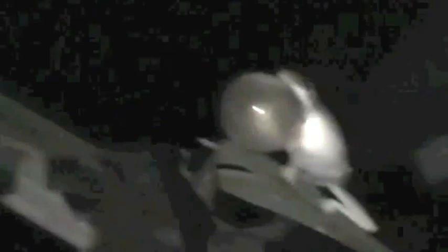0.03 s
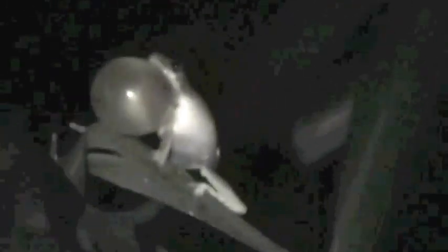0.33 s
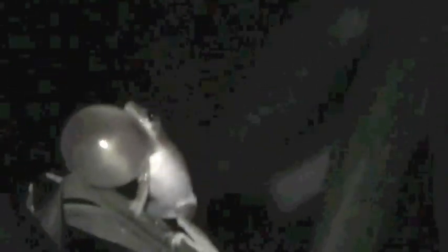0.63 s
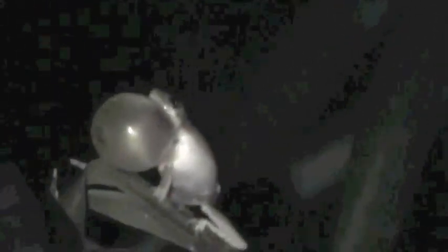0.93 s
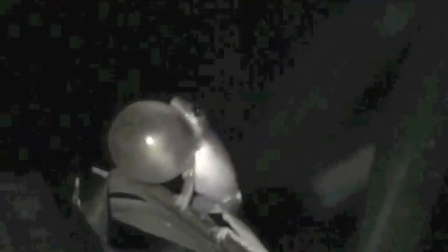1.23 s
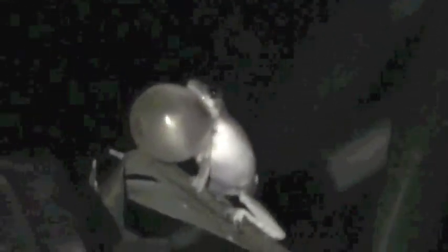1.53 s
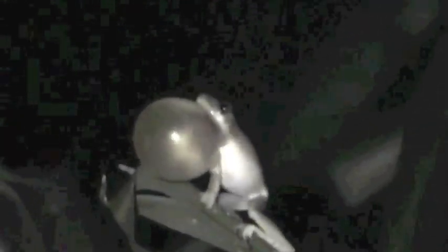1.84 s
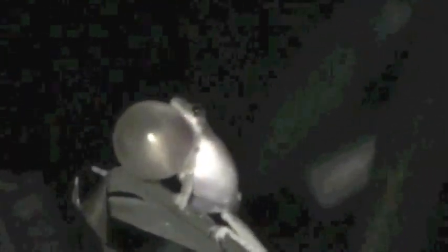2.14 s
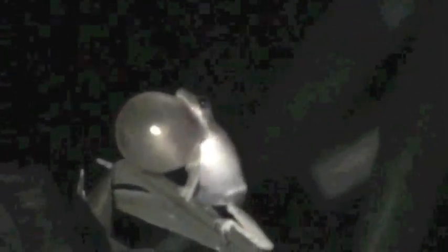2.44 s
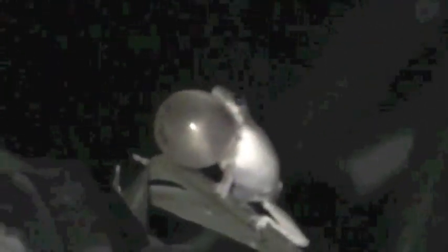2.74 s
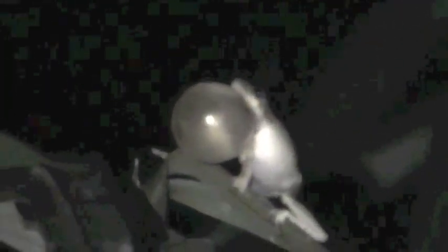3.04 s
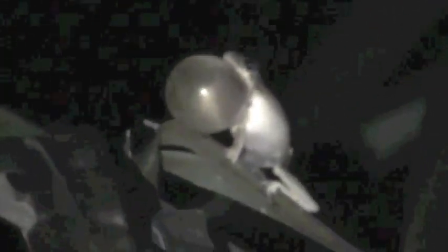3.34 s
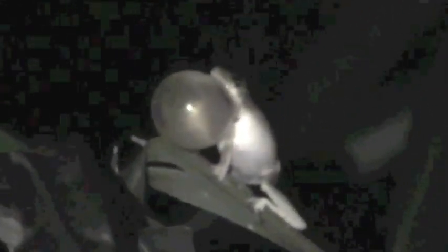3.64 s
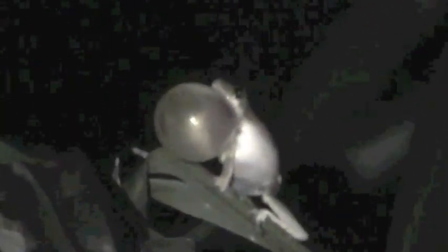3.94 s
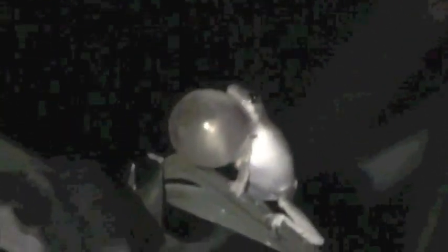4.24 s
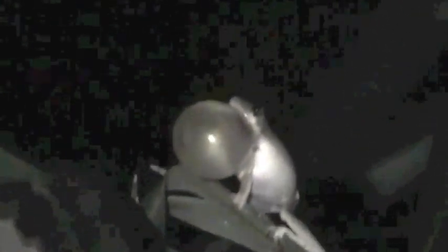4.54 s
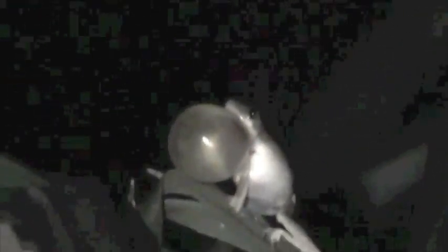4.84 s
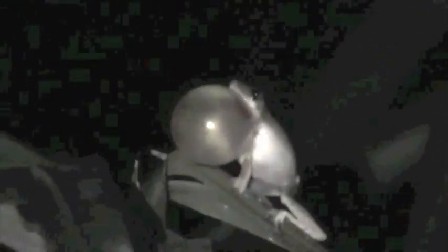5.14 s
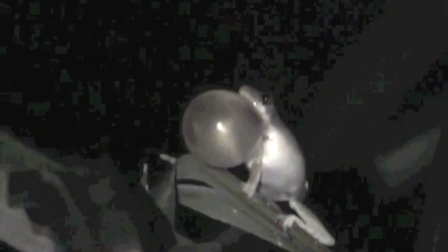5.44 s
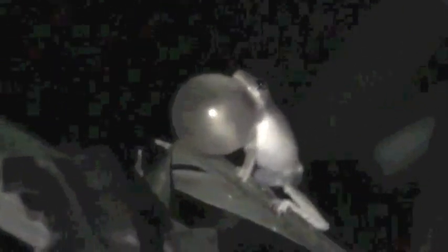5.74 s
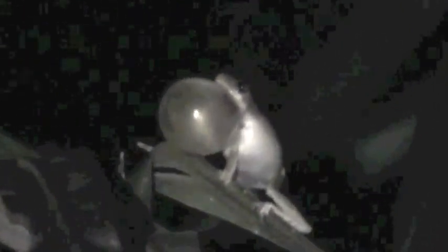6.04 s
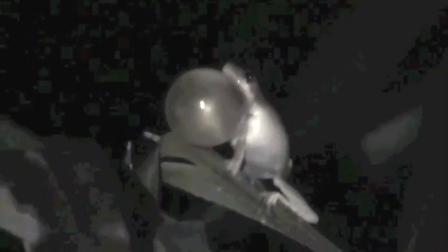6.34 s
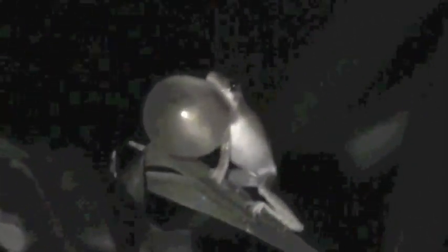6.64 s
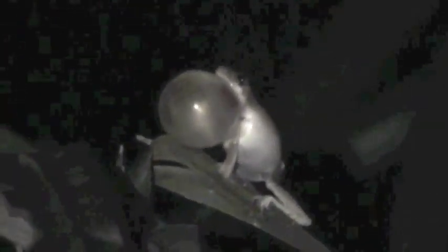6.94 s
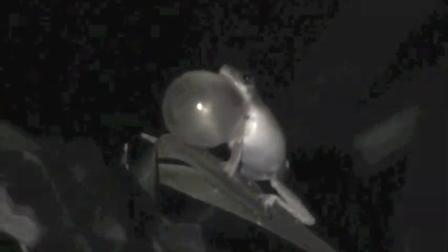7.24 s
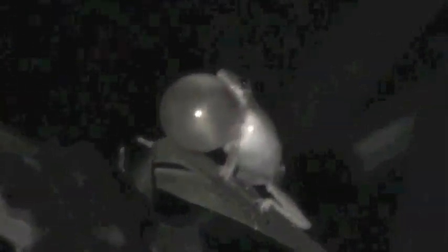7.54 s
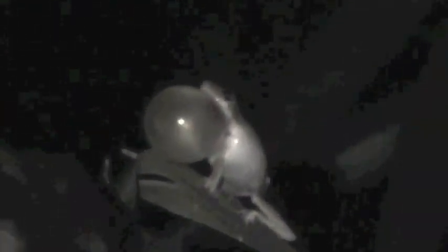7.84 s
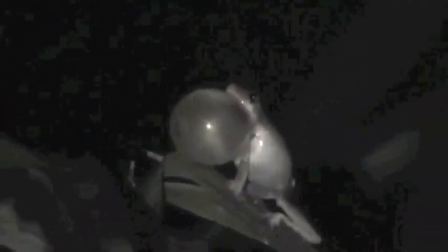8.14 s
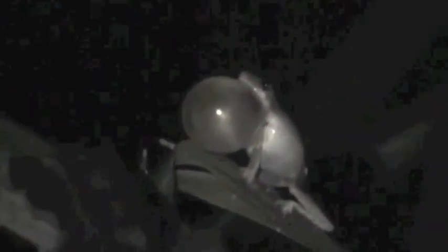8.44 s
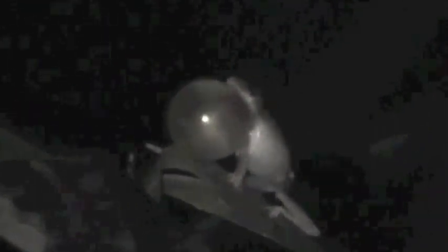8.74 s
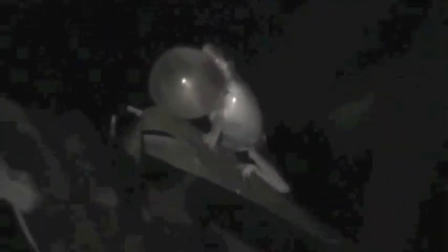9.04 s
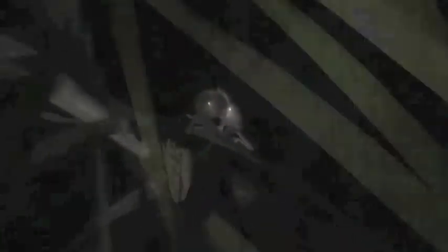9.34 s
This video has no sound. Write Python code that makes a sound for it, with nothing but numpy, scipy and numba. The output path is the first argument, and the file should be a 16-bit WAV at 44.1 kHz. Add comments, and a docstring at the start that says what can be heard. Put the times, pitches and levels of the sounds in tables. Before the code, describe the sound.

A night chorus of small frogs pipes rapid high whistles, two of them close and loud, over soft background hiss.

```python
"""Reed frogs call at night among wet leaves, each vocal sac ringing a short rising whistle near 3 kHz.
Two sit close to a small camera, over a dozen more around it, all echoed by stems and leaves.
Behind them: a blurred far chorus, one faint higher voice, soft knocks on leaves, a low hiss.
The camera's gain control ducks and thumps at the nearest calls, its blocks of sound tick at
their seams, and its clocks add faint high images."""
import sys
import numpy as np
from scipy import signal
from scipy.fft import rfft, irfft
from scipy.io import wavfile
from numba import njit

SR = 44100
rng = np.random.default_rng(int(sys.argv[2]) if len(sys.argv) > 2 else 0)


def log_audio(samples):
    """Write samples as a 16-bit WAV file to the path given in sys.argv[1]."""
    # one column per channel
    frames = np.atleast_2d(samples).T
    # limit to full scale, then quantise
    limited = np.clip(frames, -1, 1)
    pcm = np.round(limited * 32767).astype(np.int16)
    wavfile.write(sys.argv[1], SR, pcm)


N = 414540
TIME_S = np.arange(N) / SR


def amp(db):
    """Decibels to gain."""
    return 10 ** (np.asarray(db) / 20)


def unit(x):
    """Scale to rms 1."""
    return x / np.sqrt(np.mean(abs(x) ** 2) + 1e-20)


def colour(x, points):
    """Filter by (freq_hz, gain_db) points."""
    hz, db = np.transpose(points)
    bins_hz = np.fft.rfftfreq(N, 1 / SR)
    return irfft(rfft(x) * amp(np.interp(np.log(bins_hz + 1), np.log(hz), db)), N)


def waver(size, corner_hz):
    """Low-passed noise, rms 1."""
    bins_hz = np.fft.rfftfreq(size, 1 / SR)
    return unit(irfft(rfft(rng.standard_normal(size)) / (1 + (bins_hz / corner_hz) ** 2), size))


def noise_pair(shared):
    """Stereo white noise, partly correlated."""
    return np.sqrt(shared) * rng.standard_normal(N) + np.sqrt(1 - shared) * rng.standard_normal((2, N))


def add(mix, start_s, sound):
    """Mix a sound in at start_s."""
    part = mix[:, max(round(start_s * SR), 0):][:, :sound.shape[1]]
    part += sound[:, :part.shape[1]]


# Noise floor spectrum: freq_hz, gain_db
HISS_SPECTRUM = [(65, 11), (150, 0.5), (500, 1), (750, -6.5), (5000, -7.5), (12000, -7.5)]


def hiss(level_db=-48):
    """Steady hiss, strongest in the bass."""
    return amp(level_db) * unit(colour(noise_pair(0.56), HISS_SPECTRUM))


# Far chorus spectrum: freq_hz, gain_db
WASH_SPECTRUM = [(1500, -50.5), (1900, -50), (2500, -27.5), (2950, 11.5), (3250, 1.5), (3600, 1.5),
                 (4100, -50), (5200, -26), (6100, -12.5), (7200, -74)]
# Spectrum of far pips and near larynx snaps: freq_hz, gain_db
RATTLE_SPECTRUM = [(1400, -34), (1900, -10.5), (2400, -3), (3000, 4.5), (3600, 5), (4100, -13.5),
                   (6000, -41.5)]
# Far rattle envelope: time_s, level_db
RATTLE_LEVELS = [(.2, -39.5), (5.8, -42), (6.6, -36), (7.3, -39.5), (8.2, -39.5), (8.7, -35), (9.4, -32.5)]


def far_chorus(wash_db=-33, rattle_gain_db=5, pips_per_pitch_per_s=30, pip_t60_s=0.0089):
    """Countless distant calls melt into a wash, edged with a rattle of tiny pips."""
    wash = unit(colour(noise_pair(.5), WASH_SPECTRUM)) * amp(wash_db + 3 * waver(N, corner_hz=12))
    t, pips = np.arange(1000) / SR, np.zeros((2, N))
    for pitch_hz in np.geomspace(1800, 4200, 24):
        phase = 2 * np.pi * pitch_hz * t + 2 * rng.random((2, 1))
        pip = t * amp(-60 * t / pip_t60_s) * np.sin(phase)
        for start_s in rng.uniform(0, N / SR, int(pips_per_pitch_per_s * N / SR)):
            add(pips, start_s, pip)
    rattle_db = rattle_gain_db + np.interp(TIME_S, *np.transpose(RATTLE_LEVELS))
    return wash + amp(rattle_db) * unit(colour(pips, RATTLE_SPECTRUM))


# Knocks on leaves: start_s, level_db, pitch_hz
LEAF_KNOCKS = [(.545, -28, 1116), (2.9, -38, 1300), (6.228, -34.5, 765), (6.375, -26.5, 830),
               (7.399, -28, 874)]


def leaf_knocks(t60_s=0.03, octave_db=-5, roughness=0.82):
    """A struck leaf rings in two hollow, quickly damped resonances."""
    out, t = np.zeros((2, N)), np.arange(2000) / SR
    for start_s, level_db, pitch_hz in LEAF_KNOCKS:
        phase = 2 * np.pi * pitch_hz * t
        ring = np.sin(phase) + amp(octave_db) * np.sin(2 * phase)
        envelope = amp(level_db - 60 * t / t60_s) * (1 + roughness * waver(len(t), pitch_hz / 2))
        add(out, start_s, (envelope * ring)[None])
    return out


def whistle(pitch_hz, length_s, rasp=0.17, second_db=-38, third_db=-45, attack_s=0.00073, sag=.18,
            glide_hz_per_s=6300, rasp_hz=230, jitter_hz=45):
    """The vocal sac rings at one rising, rough tone that starts hard and sags."""
    t = np.arange(int(length_s * SR)) / SR
    sweep_hz = pitch_hz + glide_hz_per_s * (t - length_s / 2) + jitter_hz * waver(len(t), rasp_hz)
    phase = 2 * np.pi * np.cumsum(sweep_hz) / SR
    tone = np.sin(phase) + amp(second_db) * np.sin(2 * phase) + amp(third_db) * np.sin(3 * phase)
    progress = t / length_s
    envelope = np.minimum(t / attack_s, 1) * (1 - progress ** 3) * np.exp(sag * (1 - 2 * progress))
    return envelope * (1 + rasp * waver(len(t), rasp_hz)) * tone


def reed_echoes(sound, t60_s=0.24, stereo_spread=0.58, span_samples=6000, count=60):
    """Stems and leaves scatter a call into random echoes; energy per channel is kept on average."""
    delays = rng.integers(130, span_samples, count)
    gains = rng.standard_normal(count) + stereo_spread * rng.standard_normal((2, count))
    taps = np.zeros((2, span_samples))
    taps[:, delays] = gains * amp(-60 * delays / SR / t60_s)
    echo = signal.fftconvolve(sound[None], taps, axes=1)
    return echo * np.sqrt(2 * np.sum(sound ** 2) / np.sum(echo ** 2))


def high_caller(first_s=.71, period_s=.672, pitch_hz=4650, length_s=0.065, level_db=-44):
    """One faint, higher, hoarser voice on its own steady beat."""
    out = np.zeros((2, N))
    for start_s in np.arange(first_s, N / SR, period_s):
        call = whistle(pitch_hz, length_s, rasp=0.75, jitter_hz=200)
        add(out, start_s, amp(level_db) * reed_echoes(call))
    return out


def bank_frogs(level_db=-19, spread_db=4, pitch_hz=3020, spread_hz=170, delay_s=.011, spread_s=.017):
    """Each call of the quieter near frogs draws one from further along the bank, heard as echoes."""
    out = np.zeros((2, N))
    for cue_s in np.concatenate([starts_s for _, db, *_, starts_s in NEAR_FROGS if db < -6]):
        late, tune, effort = rng.uniform(-1, 1, 3)
        call = amp(level_db + spread_db * effort) * whistle(pitch_hz + spread_hz * tune, length_s=.03)
        add(out, cue_s + delay_s + spread_s * late, reed_echoes(call))
    return out


def pan(sound, left_db, lead_s):
    """Direct path: a level and time offset between the channels."""
    t = np.arange(len(sound)) / SR
    return np.array([amp(ear * left_db) * np.interp(t + ear * lead_s / 2, t, sound) for ear in (1, -1)])


# One frog per row, the two loudest and closest first:
# pitch_hz, level_db, length_s, pan_left_db, starts_s
NEAR_FROGS = [ (3183, -0.66, .026, -1.54, [.2555, 0.7986, 1.3247, 1.9512, 2.6062, 3.2143, 3.8296, 4.4714, 5.179, 5.833, 6.762, 7.5287, 8.0934, 8.816]),
              (2987, -2.5, .028, 0.13, [0.338, .9051, 1.5349, 2.148, 2.7682, 3.3215, 3.9263, 4.4943, 5.0845, 5.6695, 6.2503, 6.845, 7.4325, 7.9966, 8.5487, 9.1555]),
              (2996, -9, .028, 2, [.423, 1.057, 1.763, 2.586, 3.191, 3.764, 4.379, 4.924, 5.554, 6.077, 6.52, 7.053, 7.664, 8.155, 8.803]),
              (3080, -8.5, .027, -0.4, [.358, 1.222, 1.856, 2.441, 2.99, 3.642, 4.04, 5.035, 6.099, 6.83, 7.371, 7.936, 8.577, 8.994]),
              (2884, -9, .027, -0.5, [.492, 1.416, 2.029, 2.47, 3.254, 4.205, 4.896, 6.021, 6.431, 6.888, 7.402, 8.327, 8.953]),
              (3163, -10, .027, 2.5, [.462, 1.069, 1.622, 2.246, 2.871, 3.557, 4.263, 4.934, 5.641, 6.334, 7.09, 7.73, 8.366, 8.851]),
              (2896, -10, .028, 2, [.773, 1.458, 2.108, 2.749, 3.463, 4.102, 4.666, 5.274, 5.932, 6.606, 7.303, 7.905, 8.635, 9.307]),
              (2964, -9.5, .027, .4, [.298, .7, 1.247, 1.895, 2.683, 3.097, 3.972, 4.561, 5.005, 6.168, 6.726, 7.216, 7.841, 8.287, 8.706]),
              (3010, -9.5, .027, -0.57, [.56, .94, 1.932, 3.286, 4.004, 4.782, 5.363, 5.89, 6.635, 8.062, 9.109]),
              (3108, -10.5, .027, 1.15, [.177, .626, 1.275, 1.681, 2.177, 2.827, 3.595, 4.141, 4.586, 5.409, 5.807, 7.469, 9.199]),
              (3136, -12, .027, 0.4, [.689, 1.19, 1.52, 2.1, 2.595, 3.134, 3.53, 4.726, 5.32, 6.231, 7.034, 7.96, 8.342]),
              (2997, -12.5, .027, .4, [.595, 1.146, 1.503, 1.964, 2.337, 2.929, 3.333, 3.788, 4.824, 5.426, 6.344, 7.687, 8.166, 9.296]),
              (3280, -11.5, .027, -0.8, [.734, 1.58, 2.494, 2.952, 3.437, 3.735, 4.329, 4.894, 5.78, 6.548, 7.222, 7.864, 8.464, 9.138]),
              (3204, -12.5, .027, 0, [.568, 1.479, 2.804, 3.269, 4.089, 4.505, 5.08, 5.873, 7.427, 8.56]),
              (2937, -13, .027, 0, [.332, 1.201, 2.653, 3.672, 4.239, 5.113, 5.659, 6.845, 7.519, 8.037, 8.536, 9.125]),
              (2880, -13, .027, 0.2, [0.869, 1.703, 2.381, 3.118, 3.815, 4.403, 4.859, 5.499, 6.207, 6.967, 7.638, 8.73])]


def near_frogs(gain_db=-.5, effort_db=0.58, wander_hz=12, sway_db=0.46, sway_s=.00007,
               creep_db_per_s=0.4, echo_db=-5, echo_slope=0.5, snap_db=-16, snap_t60_s=0.052,
               third_db=-43, third_slope=1.38, bright_hz=2980, rasp=0.27, attack_s=.0024):
    """Calls arrive directly and through the reeds; fainter, farther frogs are wetter and duller."""
    out, snap_envelope = np.zeros((2, N)), np.zeros((1, N))
    for pitch_hz, level_db, length_s, pan_left_db, starts_s in NEAR_FROGS:
        for start_s in starts_s:
            side, stretch, hoarse, effort, tune = rng.uniform(-1, 1, 5)
            # the camera edges forward, which tells most on the nearest frogs
            creep_db = creep_db_per_s * (start_s - N / SR / 2) * amp(level_db)
            call_db = level_db + creep_db + effort_db * effort
            call_hz = pitch_hz + wander_hz * tune
            nearness_db = call_db + 12
            # the overtone rings best at one pitch
            overtone_db = third_db + third_slope * nearness_db - abs(call_hz - bright_hz) / 20
            rise_s = attack_s * amp(-nearness_db)  # distance blunts the start
            call = whistle(call_hz, length_s * (1 + stretch / 10), rasp * (1 + hoarse / 2),
                           third_db=overtone_db, attack_s=rise_s)
            call *= amp(call_db + gain_db)
            add(out, start_s, pan(call, pan_left_db + side * sway_db, side * sway_s))
            add(out, start_s, amp(echo_db - echo_slope * nearness_db) * reed_echoes(call))
            # the larynx opens with a dry snap
            t = np.arange(len(call)) / SR
            add(snap_envelope, start_s, amp(call_db + snap_db - 60 * t / snap_t60_s)[None])
    return out + snap_envelope * unit(colour(noise_pair(0.71), RATTLE_SPECTRUM))


def scene(left_db=0.78):
    """The chorus, slightly left, over knocks and hiss."""
    chorus = near_frogs() + bank_frogs() + high_caller() + far_chorus()
    return chorus * amp([[left_db], [-left_db]]) + leaf_knocks() + hiss()


@njit
def peak_follower(excess, charge, leak):
    """A capacitor charges quickly on peaks and leaks slowly."""
    out, held = np.zeros(len(excess)), 0.
    for i in range(len(excess)):
        held += charge * max(excess[i] - held, 0.) - leak * held
        out[i] = held
    return out


def gain_control(x, limit_db=-6.5, attack_s=0.0003, release_s=.056, step_db=0.81, click_db=-19):
    """Peaks duck the gain in steps; each step down clicks. Returns the sound and its control signal."""
    excess_db = np.maximum(20 * np.log10(abs(x).max(0) + 1e-9) - limit_db, 0)
    duck_db = peak_follower(excess_db, 1 / (attack_s * SR), 1 / (release_s * SR))
    stepped_db = step_db * np.floor(duck_db / step_db)
    drop_db = np.maximum(np.diff(stepped_db, prepend=0), 0)
    clicks = amp(click_db) * drop_db * noise_pair(0.52)
    return x * amp(-stepped_db) + clicks, duck_db


def thump(duck_db, leak_db=-40, highpass_hz=7, left_gain=0.18):
    """The control voltage leaks into the sound as a low thump, mostly on the right."""
    pulse = signal.lfilter(*signal.butter(1, highpass_hz, "high", fs=SR), duck_db)
    return amp(leak_db) * pulse * np.array([[left_gain], [1]])


def block_seams(x, slip_samples=1.11, blocks_per_s=30, first_s=.02977):
    """One sound block per picture; timing slips at each seam, a tick as strong as the sound it cuts."""
    block_phase = (TIME_S - first_s) * blocks_per_s % 1
    return x + slip_samples * (block_phase - .5) * np.gradient(x, axis=1)


def clock_images(x, low_hz=9500, low_db=-47, high_hz=16000, high_db=-37):
    """Two clock tones beat with the frogs and mirror them into the treble."""
    low = amp(low_db) * np.cos(2 * np.pi * low_hz * TIME_S)
    high = amp(high_db) * np.cos(2 * np.pi * high_hz * TIME_S)
    return 2 * x * (low + high)


# Camera frequency response: freq_hz, gain_db
CAMERA_RESPONSE = [(9500, 1.5), (11200, -1), (12150, -0.5), (12750, 17.5), (12950, -14.5), (13400, -25.5),
                   (14300, -37.5)]


def record(dry, ceiling=0.85, open_s=.132, fade_s=0.062, cutoff_hz=14400):
    """Camera chain: gain control, seams, overload, clock images, thump, response, fade-in, low-pass."""
    wet, duck_db = gain_control(dry)
    wet = block_seams(wet)
    wet = wet / (1 + (wet / ceiling) ** 8) ** (1 / 8)  # soft overload
    wet = colour(wet + clock_images(wet) + thump(duck_db), CAMERA_RESPONSE)
    wet *= np.clip((TIME_S - open_s) / fade_s, 0, 1) ** 2
    lowpass = signal.firwin(511, cutoff_hz, window=("kaiser", 9), fs=SR)
    return signal.oaconvolve(wet, lowpass[None], "same")


dry = scene()
out = record(dry)
log_audio(out)
```